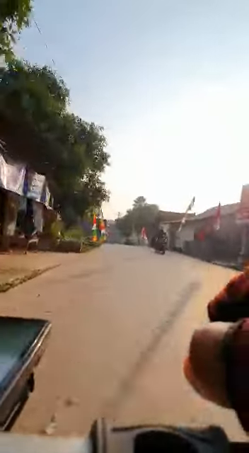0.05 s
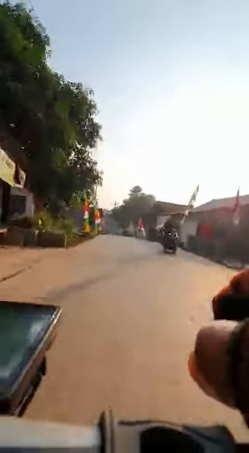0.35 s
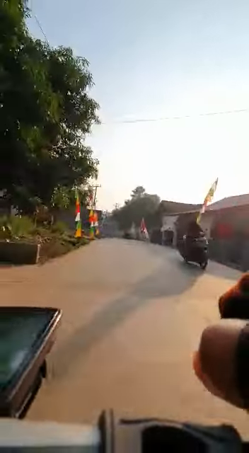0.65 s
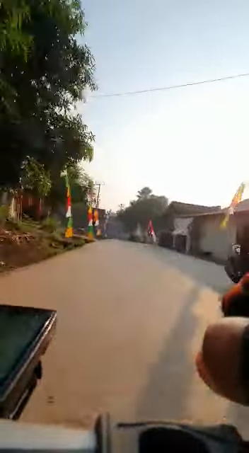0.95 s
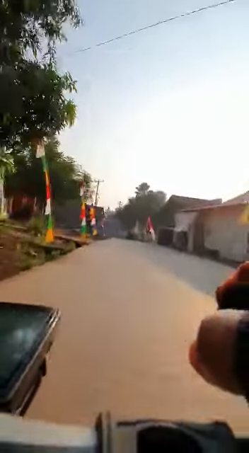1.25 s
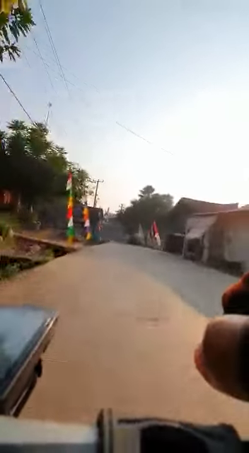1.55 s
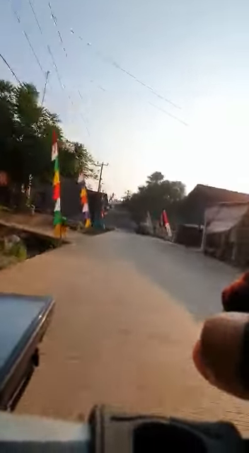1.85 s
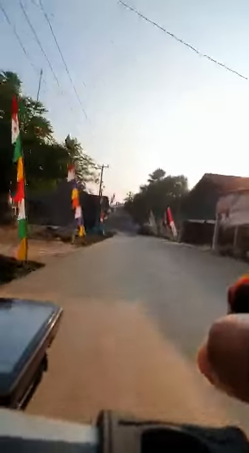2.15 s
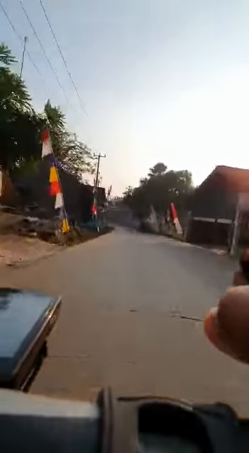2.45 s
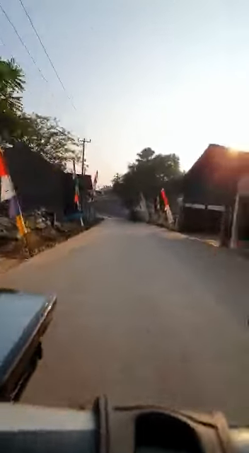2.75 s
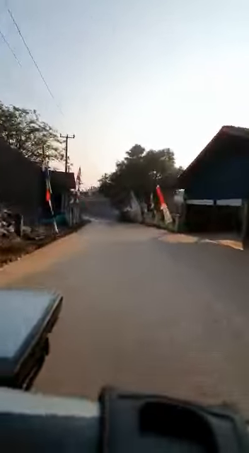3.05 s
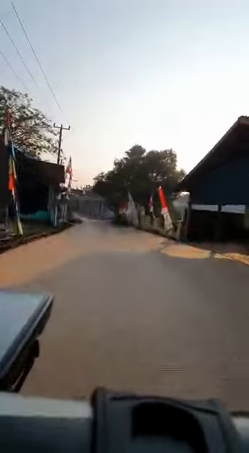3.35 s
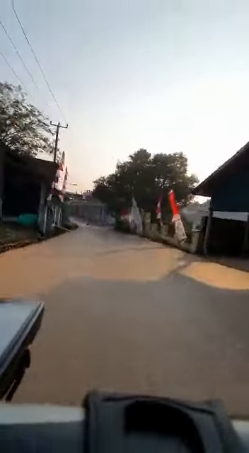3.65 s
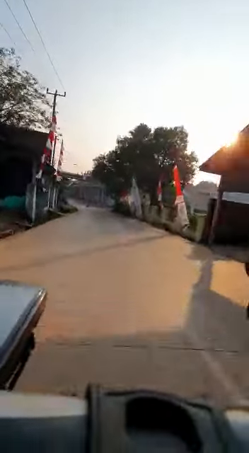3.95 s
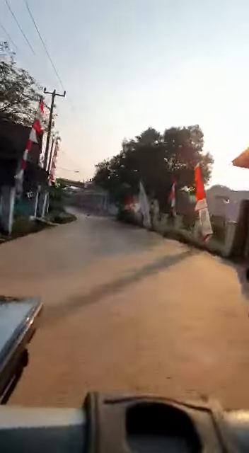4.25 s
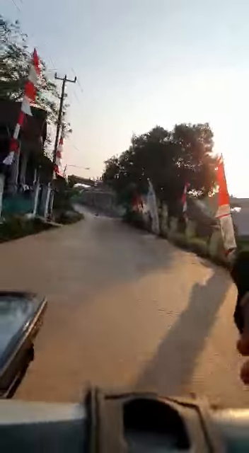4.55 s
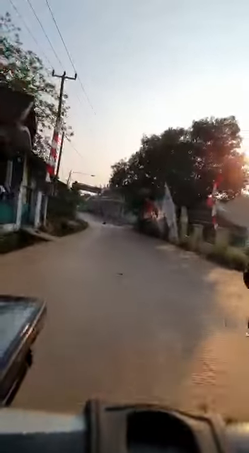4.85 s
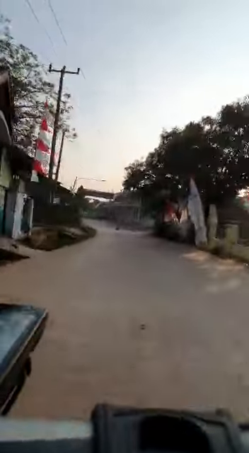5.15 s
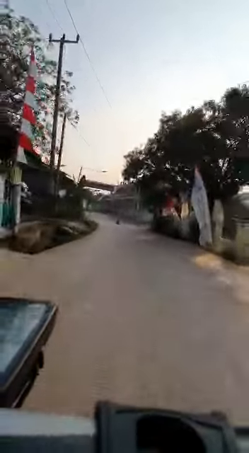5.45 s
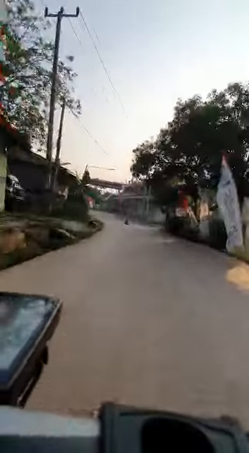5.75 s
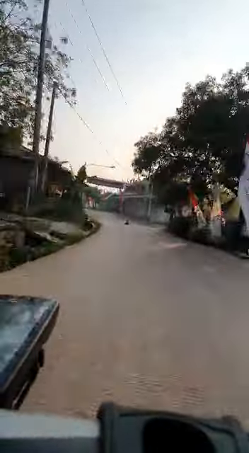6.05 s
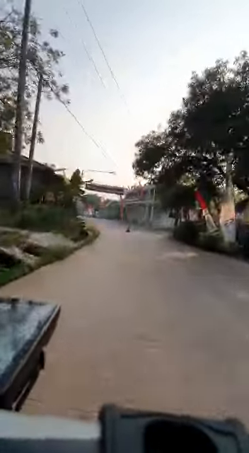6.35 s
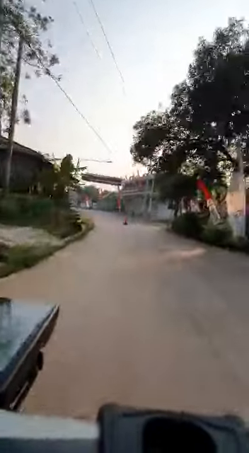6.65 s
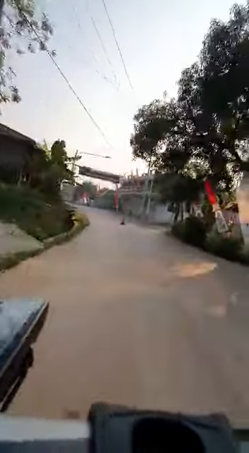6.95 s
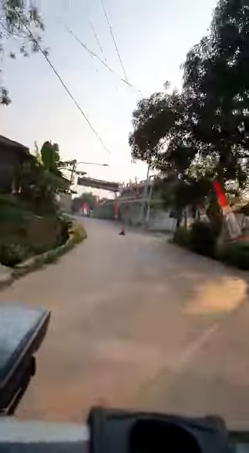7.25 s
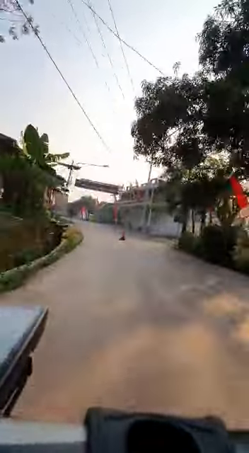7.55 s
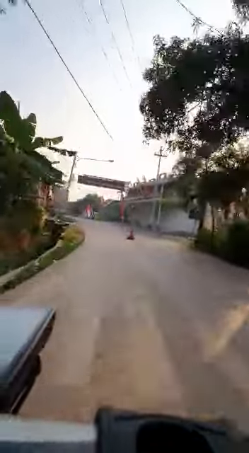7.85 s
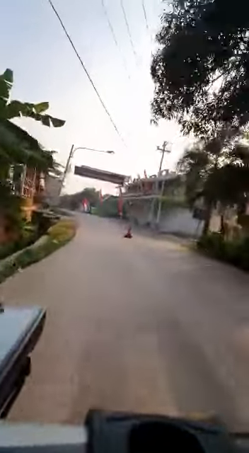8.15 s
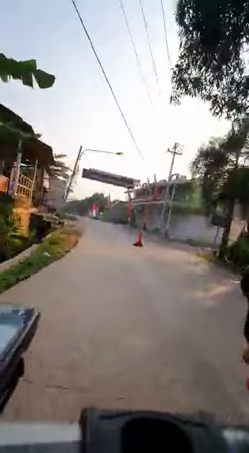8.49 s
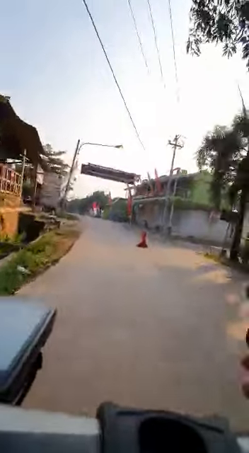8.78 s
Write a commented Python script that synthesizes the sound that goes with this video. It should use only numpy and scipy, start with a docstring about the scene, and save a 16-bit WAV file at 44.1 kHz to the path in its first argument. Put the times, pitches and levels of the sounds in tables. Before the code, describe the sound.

A bicycle rolls along a concrete village road, heard from the handlebar. From the start the tyres roar, air rushes and a low rumble sits to the left, while cables tick, sand crackles and birds chirp faintly. Road joints jolt the frame, giving sharp clacks and tiny high tings, frequent in the first three seconds, and ridges add short hollow thuds. At about 2.5 seconds the rider coasts and the freewheel starts a fast metallic buzz, with a cluster of bumps and a finger scuff near 2.8 seconds. The buzz slows into more distinct ticking from about 5.3 seconds, then quickens and strengthens around 6.6 seconds. Birds chirp louder from 5.4 seconds onward. Near 6.8 seconds fingers rub the grip, a fitting clacks and the wind turns lower in tone. A loose metal part clinks twice at about 8.7 and 8.8 seconds, the second louder.

```python
"""A bicycle rolls along a concrete village road, heard from the handlebar.
From the start, tyres roar, air rushes and the handlebar rumbles, while cables tick and sand crackles.
Road joints jolt the frame and rattle its fittings, birds chirp, and ridges thud under the wheels.
At about 2.5 s the rider coasts: the freewheel's catches buzz, faster and slower, and fingers scuff.
The birds grow louder after 5 s, the grip shifts near 6.8 s, and a loose part clinks twice at the end."""
import sys
import numpy as np
from scipy import signal
from scipy.fft import rfft, irfft
from scipy.io import wavfile
from scipy.ndimage import map_coordinates

SR = 44100
rng = np.random.default_rng(int(sys.argv[2]) if len(sys.argv) > 2 else 0)


def file_out(sig):
    """Save sig as 16-bit WAV at sys.argv[1]."""
    # one column per channel
    cols = np.atleast_2d(sig).T
    # limit, then scale
    lim = np.clip(cols, -1, 1)
    pcm = np.round(lim * 32767).astype(np.int16)
    wavfile.write(sys.argv[1], SR, pcm)


N = 393372
TIME = np.arange(N) / SR


def from_db(db):
    """Turn decibels into a factor to multiply by."""
    return 10 ** (np.asarray(db) / 20)


def rms_one(x):
    """Scale a signal to an average power of 1."""
    return x / np.sqrt(np.mean(x ** 2) + 1e-20)


def in_time(rows):
    """Join a table's rows with straight lines: one curve for each column after the time."""
    times, *columns = np.transpose(rows)
    return [np.interp(TIME, times, column) for column in columns]


def pan(left_db):
    """Two gains that make the left ear this much louder than the right."""
    return from_db(np.array([[left_db], [-left_db]]) / 2)


def hiss(likeness=0):
    """White noise for two ears; a likeness of 1 gives both the same noise."""
    left, other = rng.standard_normal((2, N))
    return np.array([left, likeness * left + np.sqrt(1 - likeness ** 2) * other])


def scatter(shape, low=-2, high=2):
    """Bell-curve random numbers, kept between two limits."""
    return np.clip(rng.standard_normal(shape), low, high)


def drift(per_s):
    """A smooth random wander of typical size 1, with about this many turns a second."""
    knots = rng.standard_normal(N // 20)
    wander = map_coordinates(knots, [np.arange(0, N, 20) * per_s / SR], order=3, mode="wrap")
    return rms_one(wander).repeat(20)[:N]


def cut(x, order, hz, keep):
    """Keep the "low" part, the "high" part or a middle "band" of a sound."""
    return signal.sosfilt(signal.butter(order, hz, keep, fs=SR, output="sos"), x)


def colour(x, points):
    """Shape the tone along (f/Hz, level/dB) points; white noise keeps its power."""
    size = 16384
    hz, db = np.transpose(points)
    log_hz = np.log(np.maximum(np.arange(size // 2 + 1) * SR / size, 1))
    bass_cut_db = 12 * np.minimum(log_hz - np.log(hz[0]), 0) / np.log(2)
    gain = rms_one(from_db(np.interp(log_hz, np.log(hz), db) + bass_cut_db))
    # minimum phase: the filter never sounds before the click that wakes it
    cepstrum = irfft(np.log(gain + 1e-6))
    cepstrum[1:size // 2] *= 2
    cepstrum[size // 2 + 1:] = 0
    response = irfft(np.exp(rfft(cepstrum)))
    return signal.oaconvolve(x, response[None], axes=1)[:, :N]


def resonance(x, hz, width_hz):
    """Bring out the sound around one pitch; white noise keeps its power."""
    r = np.exp(-np.pi * width_hz / SR)
    feed = np.sqrt((1 - r * r) / 2) * np.array([1, 0, -1])
    return signal.lfilter(feed, [1, -2 * r * np.cos(2 * np.pi * hz / SR), r * r], x + 1e-18)


def impulses(times, sizes):
    """Single clicks at the given times."""
    out = np.zeros(N)
    np.add.at(out, np.clip((np.asarray(times) * SR).astype(int), 0, N - 1), sizes)
    return out


def fade(x, t60):
    """Let each click die away; t60 is the seconds it takes to fall by 60 dB."""
    return signal.lfilter([1], [1, -from_db(-60 / (t60 * SR))], x + 1e-18)


def ring(strikes, hz, t60, phase):
    """Each strike rings one fading note, which reaches the two ears out of step."""
    pole = from_db(-60 / (t60 * SR)) * np.exp(2j * np.pi * hz / SR)
    ears = np.exp(.5j * phase * np.array([[1], [-1]]))
    return np.real(signal.lfilter([1], [1, -pole], strikes + 1e-18) * ears)


def clatter(clicks, rise_s, t60, tail_db, tail_t60):
    """Each click wakes countless close notes: a noise burst that swells, dies and leaves a weak tail."""
    power = fade(clicks ** 2, t60 / 2) + fade((from_db(tail_db) * clicks) ** 2, tail_t60 / 2)
    r = np.exp(-1 / (rise_s * SR))
    return np.sqrt(signal.lfilter([(1 - r) ** 2], [1, -2 * r, r * r], power)) * hiss()


def hits(rows, width_hz, rise_s, t60):
    """Short rough blows, each at its own pitch, from rows of (t/s, level/dB, f/Hz)."""
    out, t = np.zeros((2, N + SR)), TIME[:SR // 5]
    envelope = (1 - np.exp(-t / rise_s)) ** 2 * from_db(-60 * t / t60)
    for start_s, db, hz in rows:
        mid, side = rng.standard_normal((2, len(t))) * envelope
        burst = np.array([mid + .7 * side, mid - .7 * side])
        blow = resonance(resonance(burst, hz, width_hz), hz, 3 * width_hz)
        start = int(start_s * SR)
        out[:, start:start + len(t)] += from_db(db) * blow / np.abs(blow).max()
    return out[:, :N]


def pings(times, sizes, low_hz, high_hz, t60, spread_db, count=17):
    """Each click rings one note, picked by chance from a set between two pitches."""
    picks, phases = rng.integers(0, count, len(times)), rng.uniform(-np.pi, np.pi, count)
    sizes = sizes * from_db(spread_db * scatter(len(times), high=1.3))
    return rms_one(sum(ring(impulses(times[picks == k], sizes[picks == k]), hz, t60, phases[k])
                       for k, hz in enumerate(np.geomspace(low_hz, high_hz, count))))


# Table levels are relative: each function adds its own gain.
# How loud the ride is: t/s, rumble level/dB, tyre level/dB, air level/dB
RIDE = [(0, -52, -57, -54), (.7, -52.5, -56, -51.5), (1.7, -52, -52, -51.5), (2.15, -52.5, -54.5, -52),
        (2.6, -49, -53, -51), (2.83, -49.5, -47, -59), (3.0, -45.5, -53, -54), (3.6, -51.5, -55, -57),
        (3.95, -46, -51.5, -50), (4.5, -51, -56.5, -50), (4.9, -53.5, -58, -52.5), (5.9, -56, -62, -52.5),
        (6.6, -50.5, -62, -49.5), (7.0, -53, -58.5, -49), (7.5, -51.5, -56, -47.5), (8.92, -49.5, -56, -46)]
# Tone of the handlebar's rumble and of the tyres: f/Hz, level/dB
RUMBLE_COLOUR = [(15, -30), (28, -7), (42, 3.5), (75, 4.5), (100, 0.5), (140, -8), (250, -16), (500, -39),
                 (1000, -37)]
TYRE_COLOUR = [(60, -18), (200, -34), (280, -3.5), (380, 2.5), (560, 1.5), (900, -3.5), (1600, -3.5),
               (2300, -11), (3500, -10), (5000, -18.5), (7500, -27), (10000, -43), (16000, -22)]


def road(shake, grains_per_s=300, grip_shift_s=6.76):
    """The handlebar rumbles, the tyres roar over grit, and air rushes round the hand."""
    rumble_db, tyre_db, air_db = in_time(RIDE)
    rumble = colour(hiss(likeness=.13), RUMBLE_COLOUR) * from_db(rumble_db - 2 + 2.96 * drift(18))
    grains = (rng.random(N) < grains_per_s / SR) * from_db(7 * scatter(N))
    grit = rms_one(clatter(grains, rise_s=.0001, t60=.005, tail_db=-25, tail_t60=.02))
    tyres = colour(hiss() + from_db(-3) * grit, TYRE_COLOUR)
    tyres *= from_db(tyre_db + 6 + 4.5 * shake + 2.2 * drift(40))
    # the hand cups the air into a hollow note, which drops when the grip shifts
    shifted = np.clip((TIME - grip_shift_s) / .0096, 0, 1)
    rush = hiss(likeness=-.26) * from_db(air_db + 3 + 2 * drift(60))
    before = resonance(rush * (1 - shifted), hz=1205, width_hz=170)
    after = resonance(rush * shifted, hz=800, width_hz=156)
    air = cut(before + after, 2, [450, 2400], "band")
    return rumble * pan(24.6) + tyres * pan(-9) + air * pan(-2.7)


# Loose cables and clips on a steady road: t/s, rate/(ticks per s), level/dB
CABLE_TICKS = [(0, 48, -46.5), (2.2, 32, -44.5), (2.58, 36, -30), (2.7, 64, -34), (3.5, 206, -35.5),
               (4.1, 34, -35), (8.92, 18, -44)]
# Tone of a bright tick: f/Hz, level/dB
TICK_COLOUR = [(2000, 8.5), (3200, -1), (5000, 1.5), (7500, -6), (9000, 0.5), (10100, 5), (11500, -1.5),
               (16000, -3)]


def cable_ticks(shake, shake_ticks_per_s=200, spread_db=7):
    """Rough concrete keeps cables and clips ticking in uneven clusters, thickest just after a jolt."""
    per_s, tick_db = in_time(CABLE_TICKS)
    chance = (per_s + shake_ticks_per_s * shake) * from_db(4 * drift(14)) / SR
    clicks = (rng.random(N) < chance) * from_db(tick_db + 2.5 + spread_db * scatter(N, high=1.6))
    return colour(clatter(clicks, rise_s=.00015, t60=.005, tail_db=-9, tail_t60=.014), TICK_COLOUR)


def sand(shake, per_s=55, level_db=-51, spread_db=6):
    """Sand snaps under the tyres in fine, sharp specks, louder while the frame shakes."""
    snapping = rng.random(N) < per_s / SR
    specks = snapping * from_db(level_db + 5 * shake + spread_db * scatter(N, high=1.6))
    snaps = clatter(specks, rise_s=.0001, t60=.004, tail_db=-25, tail_t60=.02)
    return resonance(snaps, hz=3600, width_hz=3200)


# Taps of a small loose clip: t/s, level/dB, f/Hz
CLIP_TINGS = [(0.0385, -36, 8100), (0.0628, -34, 9800), (0.091, -39, 9750), (0.0997, -39, 8270),
              (0.1855, -29, 9850), (0.2867, -35, 10200), (0.623, -38, 11300), (0.6509, -38, 8020),
              (1.1832, -29.5, 9400), (1.212, -33, 9590), (1.4406, -36, 9690), (1.809, -32.5, 10000),
              (1.838, -34, 9650), (1.9026, -31, 10200), (2.07, -33, 9830), (2.1436, -38, 9300),
              (2.3795, -32, 9540), (2.4414, -39, 9690), (2.5047, -44, 9630), (2.6885, -20.5, 9500)]


def clip_tings(gain_db=2):
    """A clip taps the handlebar and rings high and very briefly."""
    times, peak_db, hz = np.transpose(CLIP_TINGS)
    return hits(zip(times, peak_db + gain_db, hz), width_hz=800, rise_s=.0013, t60=.022)


# Jolts from road joints: t/s, clack level/dB, f/Hz, bright edge/dB, thump level/dB, rebound/dB
# (the edge counts from the clack's level, the rebound from the first slap's)
JOLTS = [(0.054, -38.5, 3360, 6.5, -45, -20), (0.134, -52, 2600, 9, -64, -20),
         (0.185, -47, 2700, 6.5, -67, 1), (0.233, -47, 2560, -6, -65, -20),
         (0.2588, -34.5, 2700, -6, -54, -22), (0.3005, -36, 2640, -13, -56, -22),
         (0.3234, -37.5, 3070, 6.5, -45.5, -7), (0.342, -36, 2650, -5, -60, -26),
         (0.362, -34.5, 2450, 5, -47, -32), (0.538, -36, 3150, 2, -45, -8.5),
         (0.663, -37.5, 3220, 2, -50, -20), (0.745, -40.5, 2340, 1, -52, -15),
         (0.902, -39, 2640, 1, -45, -27), (0.995, -41, 3320, -11, -62, -20),
         (1.077, -45, 2720, -11, -63, -20), (1.1098, -28, 3100, -1.5, -38, -2.5),
         (1.126, -33, 3070, 8.5, -46, -7), (1.301, -41, 2440, -15, -41.5, -16),
         (1.4019, -36, 3130, 6, -44, -8), (1.809, -45.5, 3330, 10, -42, -5),
         (1.88, -43, 3140, 7.5, -64, -10), (2.0474, -43, 2340, 4.5, -50, -2.5),
         (2.2664, -31.5, 2730, -17, -44, -27), (2.274, -42, 3300, -10, -58, -28),
         (2.3242, -34, 4100, -8, -60, -5.5), (2.6757, -22.5, 2930, -3, -39, -10),
         (2.691, -41.5, 1790, 4, -38, -23), (2.8327, -31.5, 2240, 5.5, -43, -3),
         (3.12, -29, 2480, 2, -43, -16), (3.13, -37.5, 2800, 12.5, -41, -22),
         (3.2482, -36.5, 3200, 10.5, -41, -23), (3.376, -27, 3170, -14, -42, -21),
         (4.5513, -26.5, 3140, -6, -51, -0.5), (4.627, -40, 3180, 13, -40.5, -6),
         (5.028, -38, 3200, 8.5, -48, -17), (6.5579, -29.5, 3210, 8, -46, -5),
         (6.826, -24.5, 3060, -2, -42, -20), (8.6642, -26.5, 4450, -10, -47, -21),
         (8.83, -24, 3260, -10, -59, -17), (8.8379, -17.5, 2880, -5, -60, -12.5)]
# Tone of a clack: f/Hz, level/dB
CLACK_COLOUR = [(300, -39), (900, 5.5), (1500, 11.5), (2150, -4), (2600, 3.5), (3100, 14.5), (3600, 0),
                (4100, 13.5), (4800, 1), (7100, -1), (8000, -0.5), (10000, -18)]


def knocks(rebound_s=.04, thump_hz=75, thump_width_hz=55):
    """Jolts slap fittings on the handlebar: a pitched clack, a bright edge, a thump through the mount."""
    times, clack_db, hz, edge_db, thump_db, rebound_db = np.transpose(JOLTS)
    slaps = [times, clack_db, hz, edge_db, thump_db]
    rebounds = [times + rebound_s, clack_db + rebound_db, hz, edge_db, thump_db + rebound_db]
    times, clack_db, hz, edge_db, thump_db = np.hstack([slaps, rebounds])
    clack_taps = settling(times, clack_db + 2)
    clack = clatter(clack_taps, rise_s=.00035, t60=.008, tail_db=-14, tail_t60=.08)
    edge_taps = settling(times, clack_db + edge_db + 7)
    edge = clatter(edge_taps, rise_s=.0003, t60=.007, tail_db=-20, tail_t60=.04)
    tone = hits(zip(times, clack_db + 9, hz), width_hz=550, rise_s=.00063, t60=.026)
    thump = resonance(impulses(times, from_db(thump_db - 2)), thump_hz, thump_width_hz)
    thump = cut(thump * np.sqrt(SR / thump_width_hz), 2, 200, "low")
    return colour(clack, CLACK_COLOUR) + tone + colour(edge, TICK_COLOUR) + thump * pan(21.5)


def settling(times, db, count=4, gap_s=.006, loss_db=3):
    """A slapped fitting skips to rest in a few uneven, fading taps."""
    chance = rng.random((len(times), 2, count))
    later = times[:, None] + np.cumsum(gap_s * (.5 + chance[:, 0]), axis=1)
    weaker_db = db[:, None] - 6 - loss_db * np.arange(count) + 2.5 * (2 * chance[:, 1] - 1)
    return impulses(times, from_db(db)) + impulses(later.ravel(), from_db(weaker_db.ravel()))


def frame_shake(db_share=.48):
    """How hard the frame shakes, from 0 to about 1: each jolt kicks it, then it dies away."""
    times, clack_db = np.transpose(JOLTS)[:2]
    kicks = impulses(times, from_db(db_share * (clack_db - clack_db.max())))
    return fade(kicks, t60=.48)


# A flock further off: t/s, rate/(calls per s), level/dB, lowest mid-call f/Hz
FLOCK = [(0, 2, -54, 3900), (.7, 8, -53, 3900), (1.4, 10, -52, 3800), (2.4, 0, -53, 3500),
         (5.7, 6, -43, 3200), (6.5, 20, -38, 3400), (8.4, 22, -38.5, 3400), (8.55, 4, -47, 3200)]
# The nearest bird: t/s, length/s, start f/Hz, middle f/Hz, end f/Hz, level/dB, overtone/dB above that
CHIRPS = [(.478, 0.066, 2800, 3380, 3650, -54, -25), (.712, 0.014, 4600, 4400, 4100, -47, -25),
          (.775, 0.028, 4750, 4450, 4150, -51, -25), (.837, 0.024, 4650, 4370, 3960, -48.5, -22),
          (1.17, 0.11, 3930, 4130, 3920, -48, -23), (1.815, 0.085, 3200, 3720, 3400, -49, -25),
          (5.372, 0.06, 3420, 3300, 3270, -37.5, -2.5), (5.415, 0.081, 3750, 3960, 3990, -29.5, -21),
          (5.456, 0.032, 4200, 4600, 4370, -35, -20), (5.475, 0.044, 3370, 3370, 3400, -40.5, 5.5),
          (5.495, 0.067, 4120, 3820, 3510, -33, -25), (6.03, 0.033, 5080, 5030, 4800, -41, -25),
          (6.175, 0.072, 3170, 3610, 3220, -34, -23), (6.37, 0.026, 4370, 4470, 4400, -40, -25),
          (6.86, 0.091, 3000, 3410, 3130, -31, -26), (7.11, 0.032, 4450, 4380, 4240, -34, -25),
          (7.47, .035, 4980, 4960, 4900, -37, -30), (7.595, .1, 2850, 3520, 3400, -33, -27),
          (8.0, 0.066, 2810, 3160, 3300, -39, -17)]


def birds(highest_hz=4700, waver=.017, rasp_db=-8, echo_db=-8):
    """Birds near and far whistle short, slightly raspy arches, and the house fronts echo them."""
    song, wobble, flutter = np.zeros(N), drift(900), from_db(3.5 * drift(400))
    per_s, flock_db, lowest_hz = in_time(FLOCK)
    starts = np.flatnonzero(rng.random(N) < per_s / SR)
    calls = list(CHIRPS)
    for i, (long, high, bend, faint) in zip(starts, rng.random((len(starts), 4))):
        top_hz = lowest_hz[i] + (highest_hz - lowest_hz[i]) * high
        arch_hz = top_hz * (1 - .1725 * bend), top_hz, top_hz * (1 - .14 * (1 - bend))
        db = flock_db[i] - 5 * faint - 5 * high   # higher calls are fainter
        calls.append((i / SR, .0232 + .0373 * long, *arch_hz, db, -25))
    for start, length, *arch_hz, db, overtone_db in calls:
        at = np.arange(int(start * SR), min(int((start + length) * SR), N))
        progress = np.linspace(0, 1, len(at))
        hz = np.polyval(np.polyfit([0, .5, 1], arch_hz, 2), progress) * (1 + waver * wobble[at])
        phase = 2 * np.pi * np.cumsum(hz) / SR
        whistle = np.sin(phase) + from_db(overtone_db) * np.sin(2 * phase)
        song[at] += from_db(db) * np.sin(np.pi * progress) * flutter[at] * whistle
    song *= 1 + from_db(rasp_db) * drift(1800)
    walls = rng.standard_normal((2, SR // 4)) * from_db(-60 * TIME[:SR // 4] / .25)
    walls /= np.sqrt(np.sum(walls ** 2, axis=1, keepdims=True))
    return song + from_db(echo_db) * signal.fftconvolve(song[None], walls, axes=1)[:, :N]


# Ridges in the concrete: t/s, level/dB, f/Hz, scuff/dB above that level
BUMPS = [(0.477, -33, 70.6, -25), (0.488, -33, 1300, 0), (0.858, -34, 1300, -5), (1.572, -26.5, 620, -5.5),
         (1.666, -30, 1090, 0.5), (1.688, -27, 560, -8.5), (1.84, -32, 400, -8), (2.482, -44, 75.5, -20),
         (2.784, -19, 195, -9.5), (2.808, -28, 110, -12), (2.833, -20, 480, -13), (2.849, -27, 89, -10),
         (2.89, -28, 95, -3), (3.055, -25, 380, -11), (3.321, -29, 180, -8), (3.448, -35, 400, -3),
         (4.149, -28, 450, -11), (4.471, -34, 70.5, -29), (4.595, -31, 160, -2), (4.645, -28, 336, -4),
         (5.165, -34, 200, -5), (5.285, -29, 188, -7), (6.004, -34, 170, -8), (6.668, -33, 80, -25),
         (6.79, -37, 95, -20), (7.65, -36, 55, -27)]
# Tone of a scuff: f/Hz, level/dB
SCUFF_COLOUR = [(110, -8), (200, 8), (300, -5), (480, 9), (800, -2), (1500, 0), (3000, -40)]


def bumps(cycles=5):
    """The tyres scuff over ridges and the frame answers with short hollow thuds."""
    times, peak_db, pitch_hz, scuff_db = np.transpose(BUMPS)
    thuds = 0
    for start, db, hz in zip(times, peak_db, pitch_hz):
        thud = ring(impulses([start], from_db(db - 1)), hz, t60=cycles / hz, phase=.79)
        left_db = np.interp(hz, [100, 220], [12, -3])   # deep thuds come through the mount, on the left
        thuds += cut(thud, 1, [hz / 2, 2 * hz], "band") * pan(left_db)
    clicks = impulses(times, from_db(peak_db + scuff_db))
    scuff = clatter(clicks, rise_s=.00025, t60=.036, tail_db=-27, tail_t60=.043)
    return thuds + colour(scuff, SCUFF_COLOUR) * pan(1)


# How fast the freewheel's toothed ring slips past its catches: t/s, rate/(teeth per s)
TOOTH_RATE = [(2.45, 30), (2.85, 148), (3.35, 132), (3.7, 143), (4.25, 124), (4.4, 134), (4.62, 120),
              (5.12, 112), (5.3, 58), (5.55, 75), (5.72, 44), (5.81, 56), (5.9, 40), (5.98, 40), (6.08, 54),
              (6.21, 35), (6.35, 58), (6.52, 52), (6.62, 82), (6.75, 95), (6.85, 80), (7.1, 101),
              (7.22, 85), (7.4, 108), (7.58, 87), (7.8, 99), (8.25, 82), (8.4, 94), (8.53, 80), (8.59, 35),
              (8.66, 38), (8.72, 84), (8.92, 75)]
# Teeth off which a catch drops harder or softer than usual: t/s, accent/dB
ACCENTS = [(5.726, 7), (5.915, -4), (5.989, 9), (6.155, -2), (6.263, 2), (6.465, 5.5), (6.743, -8),
           (6.982, 5.5), (7.081, 5.5), (7.371, 6), (7.585, -3), (8.117, 5.5), (8.463, 3), (8.584, 9),
           (8.642, 5.5)]


def teeth(waver=.055, jitter=.06):
    """When each tooth passes, how long it takes and its accent; rocking feet make the speed waver."""
    per_s, = in_time(TOOTH_RATE)
    accent_times, accents = np.transpose(ACCENTS)
    passed = np.cumsum(per_s * (1 + waver * drift(14))) / SR
    # put a whole number of teeth between one accent and the next
    marks = np.interp([0, *accent_times, TIME[-1]], TIME, passed)
    number = np.cumsum(np.round(np.diff(marks, prepend=0))).astype(int)
    positions = np.interp(np.arange(number[-1]), number, marks)
    times = np.interp(positions, passed, TIME)
    period, accent_db = np.gradient(times), np.zeros(len(times))
    times += jitter * period * scatter(len(times))
    times[number[1:-1]], accent_db[number[1:-1]] = accent_times, accents
    return times, period, accent_db


# How hard the catches drop: t/s, level/dB
CATCH_LEVEL = [(2.45, -52.5), (2.7, -55), (3.3, -55), (4.2, -52), (5.3, -51), (5.6, -47.5), (5.93, -51),
               (6.2, -47.5), (6.65, -45.5), (8.5, -45), (8.61, -48), (8.75, -46), (8.92, -46.5)]
# Tone of their click: f/Hz, level/dB
CATCH_COLOUR = [(880, -41), (1500, -15.5), (1790, -9.5), (1960, -7), (2660, -4), (3310, 0), (3810, -5),
                (4120, -5.5), (5280, -10), (6240, -10.5), (7840, -18.5), (10000, -11), (12900, -17.5),
                (14900, -13), (16000, -15.5)]
# Notes of the hub and its cogs: f/Hz, level/dB, t60/s, phase between the ears/rad
HUB_NOTES = [(1996, -8.5, 0.018, 2), (2252, -11, 0.064, 4.5), (2464, -13.5, 0.085, -2),
             (2830, -16.5, 0.09, 0), (3230, -11, 0.023, -3.5), (3330, -17, 0.084, -1),
             (3570, -19, 0.029, 2), (3990, -14, 0.12, 4.5), (4200, -12, 0.044, -2),
             (4450, -23.5, 0.037, 1.5), (5560, -15.5, 0.059, 4), (10000, -28, 0.012, 4.5),
             (14900, -17, .008, 5)]
# How freely the metal rings as the hub turns: t/s, chime level/dB, lowest hub note's level/dB
RINGING = [(2.5, -3, -3), (4.4, -5.5, -1), (5.3, -8, -2.5), (6.2, -11, 9), (6.8, -3.5, -4), (8.9, -6, -2)]


def freewheel(shake, second_catch_s=.001208, uneven_db=1.5, bounce_db=-9.5, gain_db=16):
    """Two sprung catches (pawls) drop off each tooth in turn, chime, ring the hub and slide on."""
    strength_db, = in_time(CATCH_LEVEL)
    chime_db, lowest_db = in_time(RINGING)
    times, period, accent_db = teeth()
    size_luck, lag_luck, bounce_luck, second_luck = scatter((len(times), 4)).T
    sizes = from_db(uneven_db * size_luck * (accent_db == 0) + .54 * accent_db)
    # slower teeth let the catches down further apart, and leave them time to bounce
    second_times = times + second_catch_s + .07 * period * (1 + .5 * lag_luck)
    clicks = impulses(times, sizes)
    clicks += impulses(second_times, sizes * from_db(uneven_db * second_luck - 3))
    clicks += impulses(times + period * (.4 + .12 * bounce_luck), sizes * from_db(bounce_db))
    drops = rms_one(clatter(clicks, rise_s=.001, t60=.012, tail_db=-17, tail_t60=.12))
    whirr = from_db(-6) * hiss()
    crack = rms_one(colour(drops + whirr, CATCH_COLOUR))
    # no two teeth are equally sharp, so the top of the click glints and the springs sizzle
    sizzle = pings(second_times, sizes, 14300, 15400, t60=.009, spread_db=5, count=5)
    glint = cut(crack, 1, 12000, "high") * (from_db(4 * drift(45)) - 1)
    crack += glint + from_db(-12.5) * sizzle
    taps = rms_one(clatter(clicks, rise_s=.0005, t60=.004, tail_db=-14, tail_t60=.08))
    slide = from_db(-5) * hiss()
    strikes = (taps + slide)[0]
    # the contact point travels round the hub: each note swells by itself and different cogs answer
    notes = []
    for hz, db, t60, phase in HUB_NOTES:
        swell = from_db(4 * np.minimum(drift(24), 1.3))
        notes.append(from_db(db) * rms_one(ring(strikes * swell, hz, t60, phase)))
    cogs = pings(second_times, sizes, 1980, 5100, t60=.032, spread_db=4)
    cogs = from_db(-6) * rms_one(colour(cogs, CATCH_COLOUR))
    hub = from_db(2 * drift(7) - 1) * (from_db(lowest_db) * notes[0] + sum(notes[1:]))
    chime = from_db(chime_db) * catch_chime(times + second_catch_s, accent_db)
    coasting = np.clip((TIME - TOOTH_RATE[0][0]) / .15, 0, 1)
    level = coasting * from_db(strength_db + gain_db + 3 * shake)
    return level * rms_one(crack + hub + cogs + chime) * pan(-.55)


def catch_chime(times, accent_db, hz=3380, spread_db=3.2):
    """The catch itself sounds one short, clean note at each drop, now loud, now faint."""
    luck_db = spread_db * scatter(len(times), -2.5, 1) * (accent_db == 0)
    note = ring(impulses(times, from_db(luck_db + accent_db)), hz, t60=.009, phase=1.5)
    return rms_one(resonance(note, hz, width_hz=350))


# Fingers rubbing the handlebar: t/s, length/s, level/dB, f/Hz, width/Hz
RUBS = [(2.686, 0.047, -52, 1500, 1200), (2.81, 0.094, -40.5, 1500, 900), (6.755, 0.094, -36.5, 775, 350)]


def finger_rubs(rough_db=6, gain_db=.5):
    """Skin sticks and slips in short scuffs."""
    out = np.zeros((2, N))
    slips = hiss() * from_db(rough_db * np.minimum(drift(250), 1))
    for start, length, db, hz, width_hz in RUBS:
        progress = np.clip((TIME - start) / length, 0, 1)
        stroke = np.sqrt(np.abs(np.sin(np.pi * progress)))
        out += resonance(slips * stroke * from_db(db + gain_db), hz, width_hz)
    return out * pan(-3)


# Two hard jolts to a loose metal part: t/s, level/dB
CLINKS = [(8.665, -26), (8.839, -14)]
# Its notes: f/Hz, level/dB, t60/s, phase between the ears/rad
CLINK_NOTES = [(4100, -1, 0.059, 1.2), (5850, -5, 0.021, -1), (6780, -10, .02, .5), (7060, -6, 0.03, .5),
               (9200, -11, 0.016, 0)]


def clinks():
    """A loose metal part is jolted and rings briefly on several high notes at once."""
    times, clink_db = np.transpose(CLINKS)
    return sum(ring(impulses(times, from_db(clink_db + db)), hz, t60, phase)
               for hz, db, t60, phase in CLINK_NOTES)


def scene():
    """Add up everything that reaches the handlebar."""
    shake = frame_shake()
    rolling = road(shake) + cable_ticks(shake) + sand(shake)
    return rolling + clip_tings() + knocks() + birds() + bumps() + freewheel(shake) + finger_rubs() + clinks()


def record(dry, ceiling=.9, cutoff_hz=15720):
    """Round off the tallest peaks and cut away the very highest sounds."""
    rounded = ceiling * np.tanh(dry / ceiling)
    return signal.sosfilt(signal.ellip(12, .1, 80, cutoff_hz, fs=SR, output="sos"), rounded)


dry = scene()
out = record(dry)
file_out(out)
```